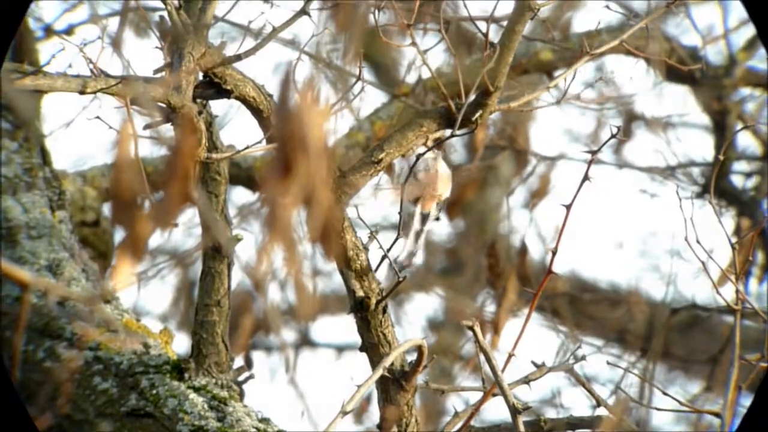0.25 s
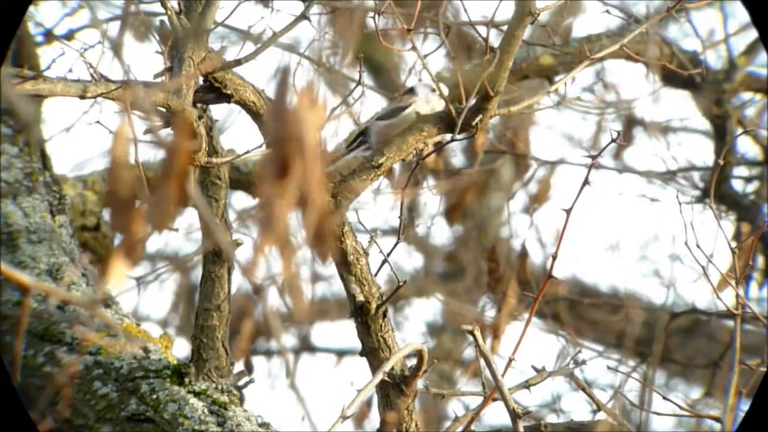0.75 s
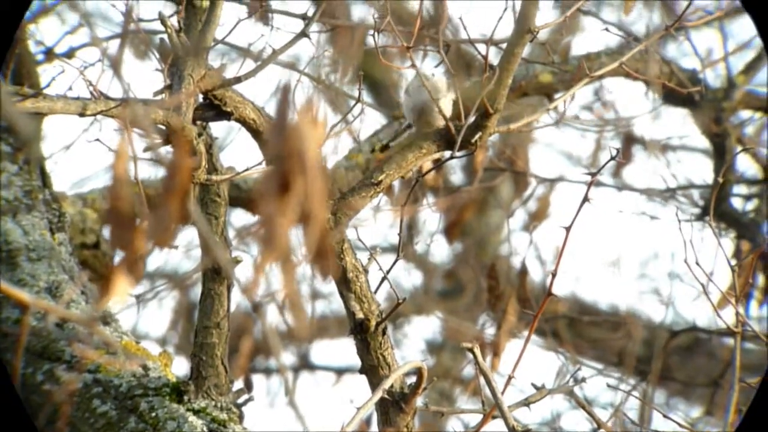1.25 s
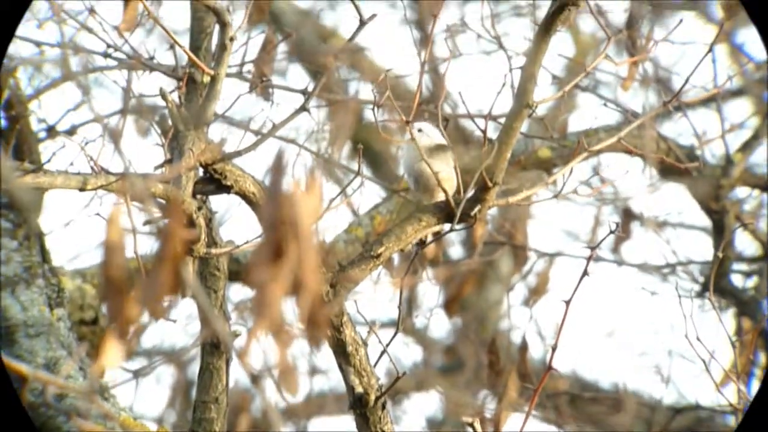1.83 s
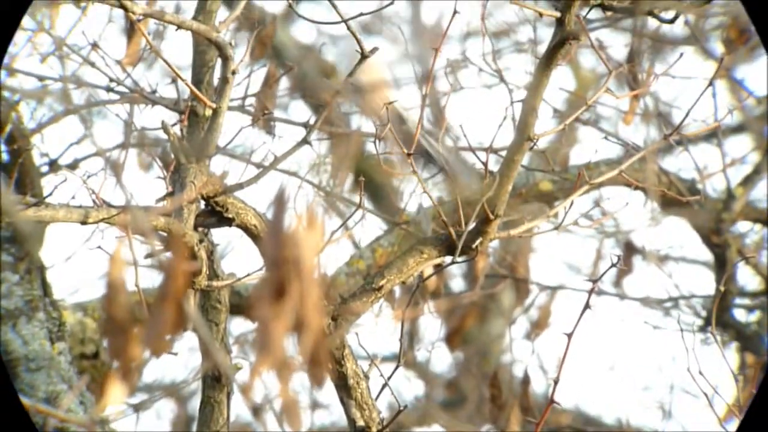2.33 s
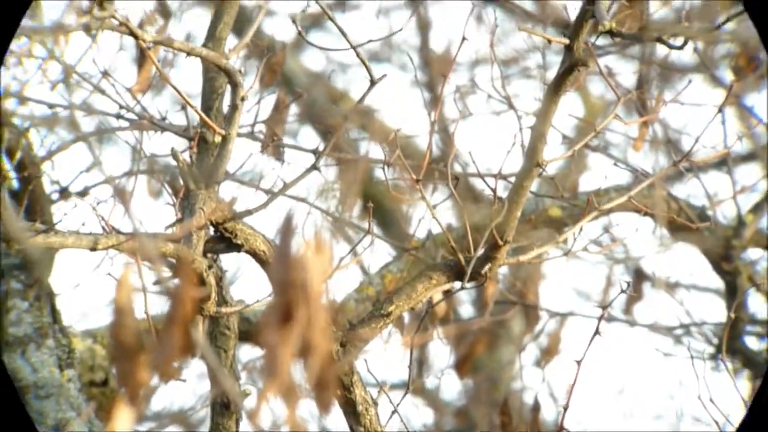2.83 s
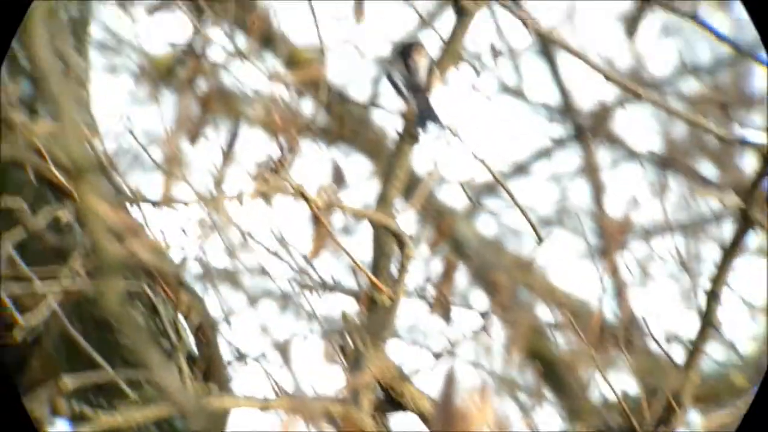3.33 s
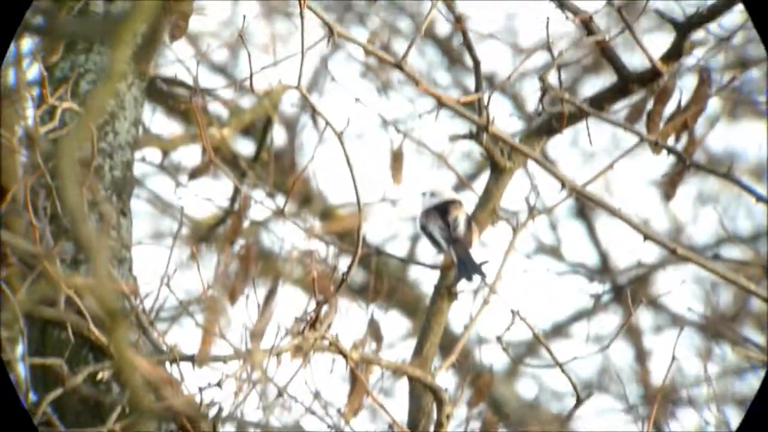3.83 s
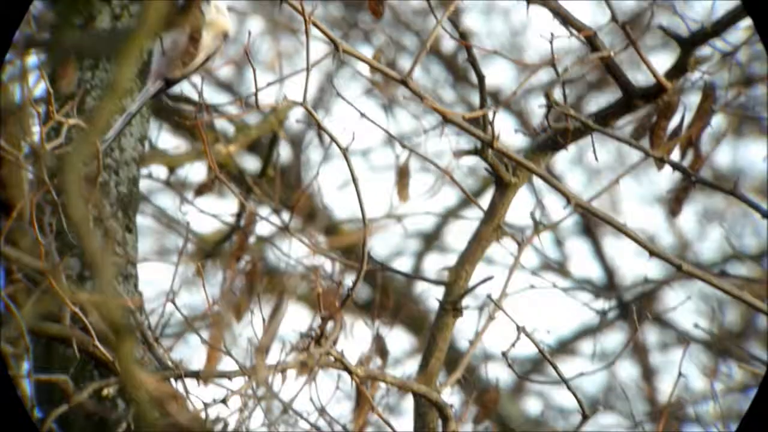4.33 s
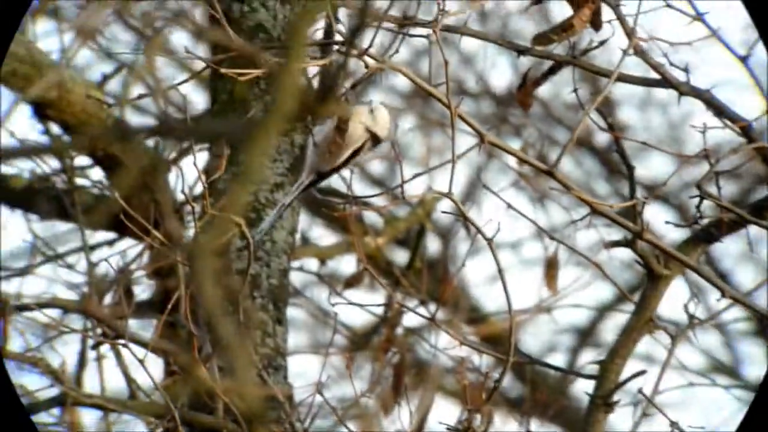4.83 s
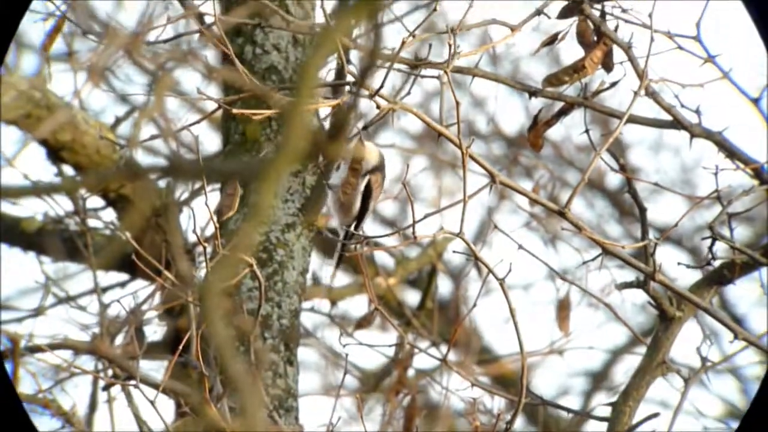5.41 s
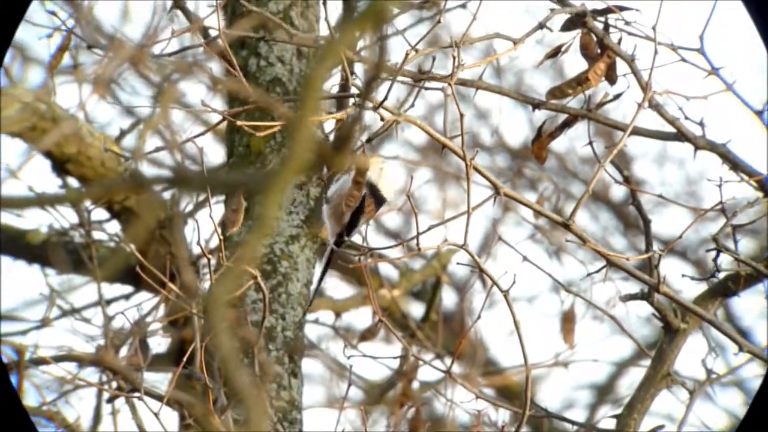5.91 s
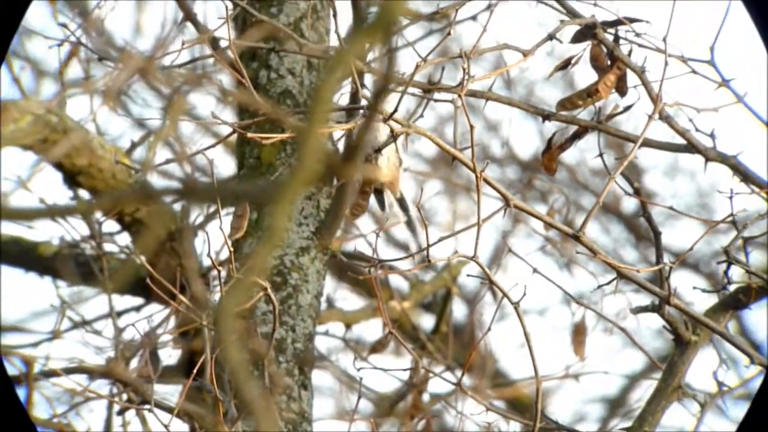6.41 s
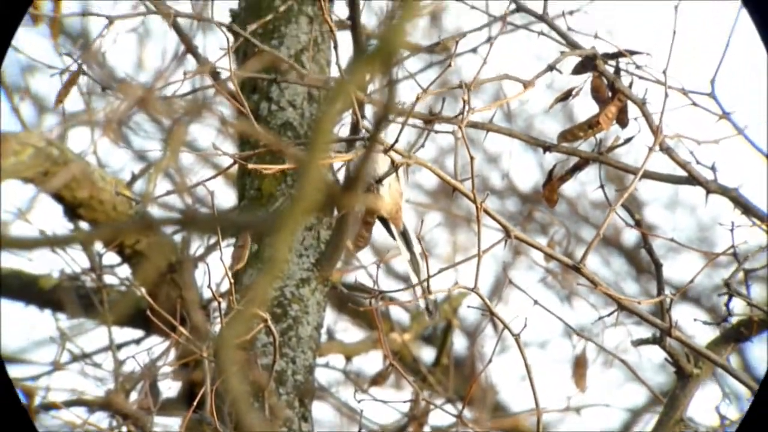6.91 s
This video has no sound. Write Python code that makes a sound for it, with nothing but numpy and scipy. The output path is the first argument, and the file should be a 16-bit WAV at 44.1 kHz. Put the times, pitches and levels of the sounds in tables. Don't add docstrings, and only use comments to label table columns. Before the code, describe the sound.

Short, high, downward-slurred whistles from a small bird come sparsely through leafless trees with a slight woodland echo, the first followed by a tiny chip. Underneath run a soft broad roar of far traffic, a low engine hum swelling and fading, and wind rumble on a hand-held microphone. Quick plastic clicks open the scene; a dull gust bump lands midway, more grip rumble follows, and a faint low hoarse call closes it.

```python
import sys
import numpy as np
from scipy import signal
from scipy.fft import rfft, irfft, next_fast_len
from scipy.io import wavfile
from scipy.ndimage import uniform_filter1d, map_coordinates

SR = 44100
rng = np.random.default_rng(int(sys.argv[2]) if len(sys.argv) > 2 else 0)


def waveform_to_disk(signal):
    frames = np.transpose(np.atleast_2d(signal))
    scaled = np.clip(frames, -1, 1) * 32767
    samples = np.round(scaled).astype(np.int16)
    wavfile.write(sys.argv[1], SR, samples)


def invert_db(level):
    return 10 ** (np.asarray(level, dtype=float) / 20)


N = 316549

# start_s, length_s, middle_pitch_hz, bow_hz, peak_level_db
WHISTLED_NOTES = [
    (.157, .117, 2900, 35, -54.5),
    (1.332, .127, 2935, 60, -52),
    (1.652, .135, 2838, -15, -56),
    (3.578, .097, 2865, -45, -52.5),
    (3.882, .123, 2915, 25, -54.5),
    (5.587, .126, 2905, 115, -49.5),
]
# time_s, pitch_hz, level_db
CHIP = [
    (.488, 3080, -71),
    (.496, 3020, -57),
    (.506, 3000, -76),
]
# time_s, pitch_hz, level_db
FAR_CALL = [
    (6.99, 1080, -61),
    (7.04, 1090, -58),
    (7.068, 1115, -53.5),
    (7.1, 1135, -55),
    (7.125, 1120, -64),
]
# time_s, peak_level_db, favoured_pitch_hz
HOUSING_TICKS = [(.1470, -44, 1430), (.1474, -43, 2470), (.1472, -44.5, 3500), (.1508, -44, 2100),
                 (.2005, -51, 3000), (.2032, -46.5, 2470), (.2052, -40, 1430), (.2105, -49, 2200),
                 (.2255, -49, 3300), (.2282, -44, 1450), (.2292, -47, 2400), (.233, -47, 1430),
                 (.3135, -50, 3200), (.3175, -50, 3500), (.321, -48, 2100), (.3245, -48, 1430)]
# pitch_hz, t60_s
HOUSING_MODES = [(1430, .034), (2100, .024), (2470, .02), (3500, .011)]
# centre_s, length_s, level_db
GRIP_SHIFTS = [
    (0.103, 0.36, -59),
    (3.374, .15, -54.5),
    (5.896, .25, -58.5),
    (7.118, .15, -61),
]
# frequency_hz, density_db
GRIP_SPECTRUM = [(8, -6.5), (28, 1.5), (50, -4), (90, -14), (200, -51.5)]
# time_s, level_db
WIND_STRENGTH = [(0, -54), (.4, -60), (1, -59), (2.4, -59.5), (2.7, -53), (3.15, -57.5), (3.4, -50),
                 (3.7, -57.5), (4, -56.5), (4.5, -57), (5.1, -59), (5.35, -58), (5.55, -60), (6, -55),
                 (6.3, -58), (7.18, -59.5)]
# frequency_hz, density_db
WIND_SPECTRUM = [(8, -8.5), (25, -14), (45, -3), (75, 5.5), (110, -1.5), (200, -6.5), (400, -42.5)]
# centre_s, pitch_hz, length_s, peak_level_db
GUST_SLAP = (3.377, 110, .024, -36)
# time_s, level_db
ENGINE_STRENGTH = [(0, -68), (.2, -45), (.45, -54.5), (1.4, -54.5), (1.7, -45.5), (1.98, -57), (2.28, -44),
                   (2.52, -58), (3.05, -50), (3.68, -56), (3.94, -46.5), (4.24, -48), (4.55, -51.5),
                   (5.2, -54), (6, -53), (6.3, -75), (6.7, -50), (7.18, -61)]
# centre_hz, wander_hz
ENGINE_PITCH = (94, 2.5)
# time_s, level_db
TYRE_STRENGTH = [(0, -51), (2.9, -50.5), (3.8, -50.5), (6, -51), (7.18, -49.7)]
# frequency_hz, density_db
TYRE_SPECTRUM = [(30, -42), (60, -12), (85, -3.5), (120, -3.5), (205, -7.5), (320, -10), (450, -13),
                 (750, -13.5), (1070, -11.5), (1500, -16.5), (2320, -23), (3000, -24), (3500, -29.5),
                 (4300, -45.5)]
# frequency_hz, density_db
HISS_SPECTRUM = [(2240, -31), (3800, -0.5), (7170, -1), (7630, -3), (8020, -17), (10400, -41.5),
                 (17600, -120)]
# pitch_hz, rms_level_db
MOTOR_WHINES = [(4389, -85), (6222, -89), (6666, -87)]


def unit(x):
    return x / np.sqrt(np.mean(x ** 2) + 1e-20)


def curves(rows, t):
    times, *columns = np.transpose(rows)
    return [np.interp(t, times, column) for column in columns]


def wobble(rate, size=N):
    knots = rng.standard_normal(int(N * rate / SR) + 4)
    return map_coordinates(knots, [np.arange(size) * rate / SR])


def filtered(x, response):
    m = next_fast_len(N + SR // 2)
    return irfft(rfft(x, m) * response(np.fft.rfftfreq(m, 1 / SR)), m)[..., :N]


def rush(spectrum, patchy_db):
    z = signal.stft(rng.standard_normal(N + 512), nperseg=512)[2]
    field = uniform_filter1d(rng.standard_normal(z.shape), size=6, axis=0)
    field = uniform_filter1d(field, size=14, axis=1)
    noise = signal.istft(z * invert_db(patchy_db * unit(field)), nperseg=512)[1][:N]
    knots_hz, knots_db = np.transpose(spectrum)

    def colour(hz):
        return invert_db(np.interp(np.log(hz + 1), np.log(knots_hz + 1), knots_db))

    return unit(filtered(noise, colour))


def note(start, length, hz, bow_hz, peak_db):
    u = np.linspace(0, 1, num=25)
    peak_at = .66
    fall_hz_per_s = 2450 + 7 * bow_hz
    pitch = hz - fall_hz_per_s * (u - .5) * length - bow_hz * (2 * u - 1) ** 2
    swell_db = 11.5 * np.clip(1 - u / peak_at, 0, 1) ** 1.6
    tire_db = 1.8 * np.clip((u - peak_at) / (1 - peak_at), 0, 1)
    release_db = 10 * np.clip(1 - (1 - u) * length / .011, 0, 1)
    return np.transpose([start + u * length, pitch, peak_db - swell_db - tire_db - release_db])


def whistle(rows, flutter_db, waver_hz, edge_s):
    first, last = round(rows[0][0] * SR), min(round(rows[-1][0] * SR), N)
    t = np.arange(first, last) / SR
    hz, db = curves(rows, t)
    hz = hz + waver_hz * wobble(60, size=len(t))
    level = invert_db(db + flutter_db * wobble(90, size=len(t)))
    fade = np.clip(np.minimum(t - t[0], t[-1] - t) / edge_s, 0, 1)
    out = np.zeros(N)
    out[first:last] = np.sqrt(2) * fade * level * np.sin(2 * np.pi * np.cumsum(hz) / SR)
    return out


def near_bird():
    phrases = [note(*row) for row in WHISTLED_NOTES] + [CHIP]
    direct = sum(whistle(rows, flutter_db=1.2, waver_hz=7, edge_s=.004) for rows in phrases)
    t = np.arange(SR // 2) / SR
    decay = invert_db(-60 * t / .4)
    trunks = rng.standard_normal(len(t)) * decay * (t > .012)
    echo = signal.fftconvolve(direct, trunks / np.linalg.norm(trunks))[:N]
    return invert_db(-.8) * direct + invert_db(-17) * echo


def far_bird():
    return whistle(FAR_CALL, flutter_db=1.5, waver_hz=15, edge_s=.02)


def housing():
    rings, snaps = np.zeros(N), np.zeros(N)
    t = np.arange(SR // 10) / SR
    rise = 1 - np.exp(-t / .0004)
    modes_hz = np.transpose(HOUSING_MODES)[0]
    favour_octaves, off_spot_db, scatter_db, detune = .35, 13, 1, .008
    for start, peak_db, spot_hz in HOUSING_TICKS:
        level_luck, pitch_luck = rng.standard_normal((2, len(HOUSING_MODES)))
        distance = np.log2(modes_hz / spot_hz) / favour_octaves
        levels = peak_db - off_spot_db * (1 - np.exp(-distance ** 2)) + scatter_db * level_luck
        ring = np.zeros(len(t))
        for db, luck, (hz, t60) in zip(levels, pitch_luck, HOUSING_MODES):
            ring += invert_db(db - 60 * t / t60) * np.sin(2 * np.pi * hz * (1 + detune * luck) * t)
        snap = invert_db(np.mean(levels) + 15 - 60 * t / .006) * rng.standard_normal(len(t))
        i = round(start * SR)
        rings[i:i + len(t)] += invert_db(4.5) * rise * ring
        snaps[i:i + len(t)] += rise * snap
    return rings + filtered(snaps, lambda hz: 1 / (1 + 1j * hz / 4000) ** 3)


def hands():
    t = np.arange(N) / SR
    swell = sum(invert_db(db) * np.exp(-((t - s) / length) ** 2) for s, length, db in GRIP_SHIFTS)
    return swell * rush(GRIP_SPECTRUM, patchy_db=3.3)


def wind():
    t = np.arange(N) / SR
    (strength_db,) = curves(WIND_STRENGTH, t)
    buffet = invert_db(strength_db + 5.5 + 0.81 * wobble(7)) * rush(WIND_SPECTRUM, patchy_db=-1.2)
    centre, hz, length, db = GUST_SLAP
    slap = invert_db(db) * np.exp(-((t - centre) / length * 2) ** 2) * np.sin(2 * np.pi * hz * (t - centre))
    return buffet + slap


def traffic():
    t = np.arange(N) / SR
    (engine_db,), (tyre_db,) = curves(ENGINE_STRENGTH, t), curves(TYRE_STRENGTH, t)
    centre_hz, wander_hz = ENGINE_PITCH
    phase = 2 * np.pi * np.cumsum(centre_hz + wander_hz * wobble(6)) / SR
    drone = invert_db(engine_db - 0.2 + 1.9 * wobble(8)) * np.sin(phase)
    roar = invert_db(tyre_db + 3.0) * rush(TYRE_SPECTRUM, patchy_db=0.71)
    return drone + roar


def scene():
    return (near_bird() + far_bird() + housing() + hands() + wind() + traffic())[None]


def low_pass(x):
    return signal.sosfilt(signal.butter(12, 8170, fs=SR, output="sos"), x)


def record(dry):
    t = np.arange(N) / SR
    hiss = invert_db(-67.5) * rush(HISS_SPECTRUM, patchy_db=-0.25)
    whines = sum(np.sqrt(2) * invert_db(db) * np.sin(2 * np.pi * hz * t) for hz, db in MOTOR_WHINES)
    kept = filtered(dry, lambda hz: hz < 7500)
    offset = -.0072
    rounding = invert_db(-98) * rng.standard_normal(N)
    return low_pass(kept + hiss + whines + offset + rounding)


dry = scene()
out = record(dry)
waveform_to_disk(out)
```